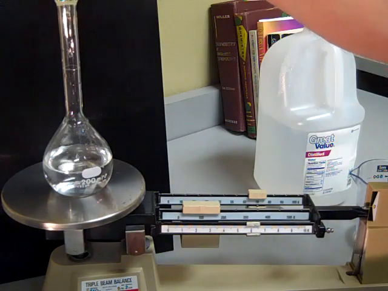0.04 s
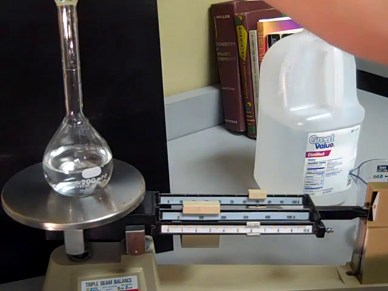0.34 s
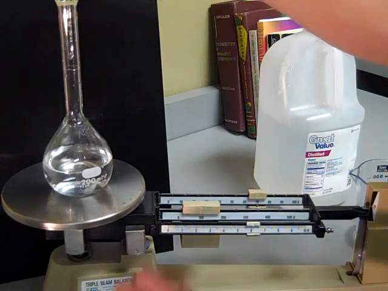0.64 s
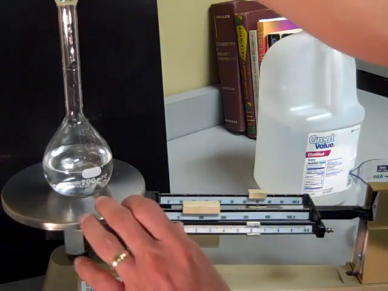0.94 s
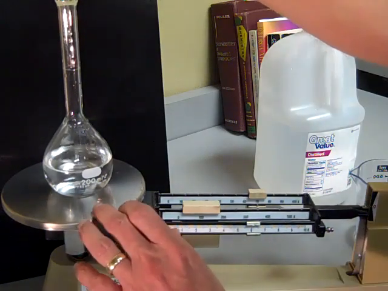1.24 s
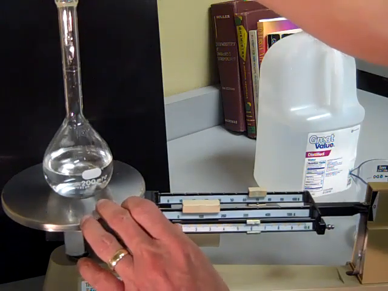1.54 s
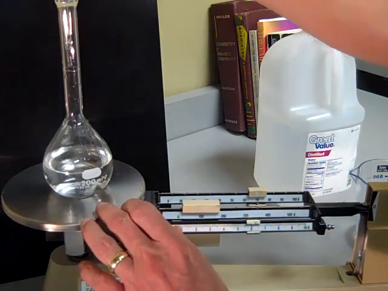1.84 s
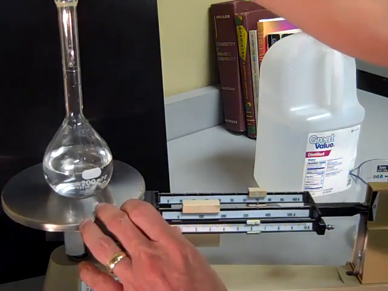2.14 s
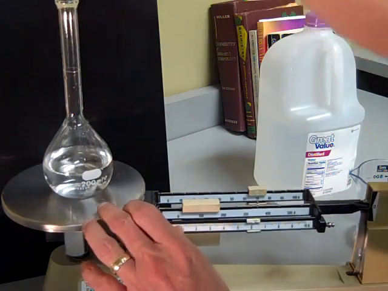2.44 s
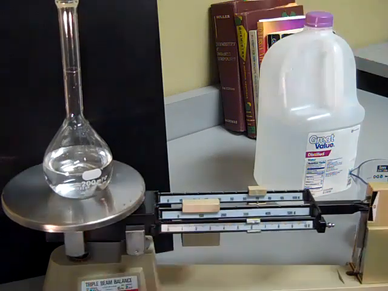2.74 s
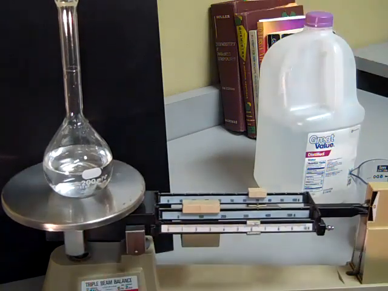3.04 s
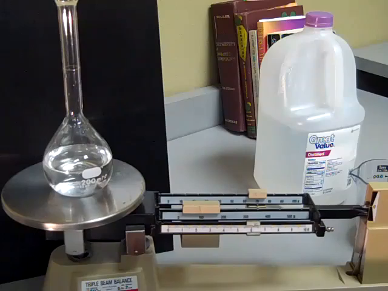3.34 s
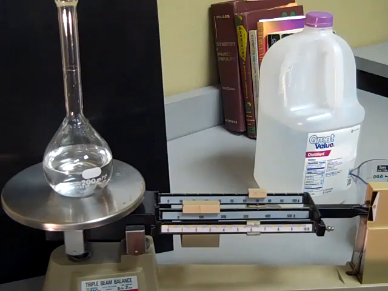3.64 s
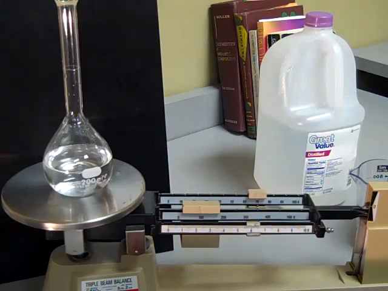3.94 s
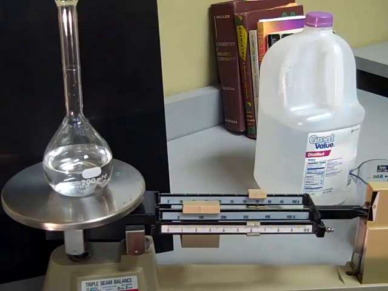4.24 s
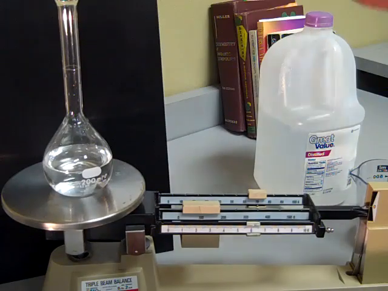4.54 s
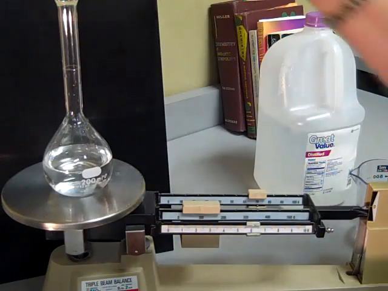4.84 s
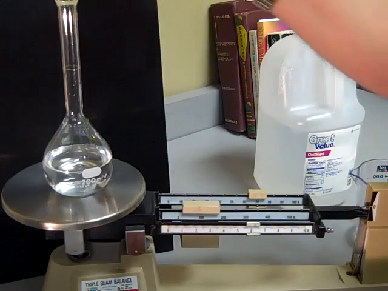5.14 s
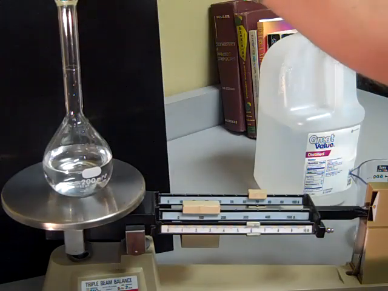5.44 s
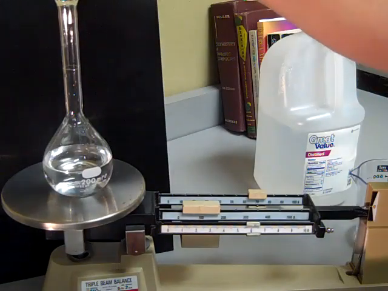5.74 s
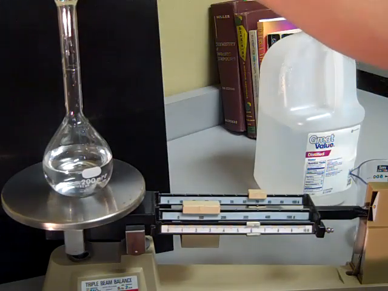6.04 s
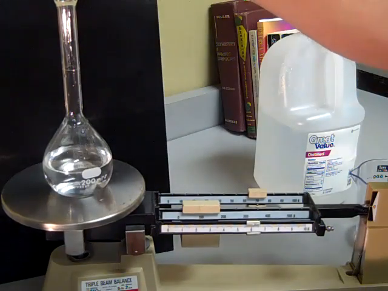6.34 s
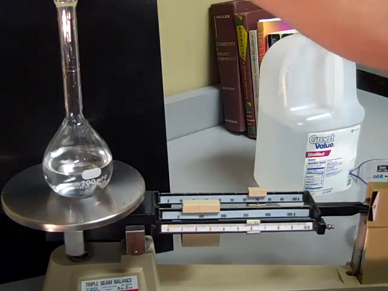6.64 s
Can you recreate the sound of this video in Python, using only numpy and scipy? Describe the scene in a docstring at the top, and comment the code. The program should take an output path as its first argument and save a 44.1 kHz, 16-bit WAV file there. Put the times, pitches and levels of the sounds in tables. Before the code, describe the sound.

A dropper clinks on a ringing glass flask in a small humming room, with dull knocks and a few faint water plinks.

```python
"""A small laboratory, close to a beam balance where a glass flask is topped up with a dropper.
Left of the microphones the dropper clinks against the neck and sets both glasses ringing; the loudest
clink overloads the left microphone. Drops plink as they trap bubbles, something ticks, things bump on
the bench, the beam taps its stop, a hand brushes past and two thin whistles glide by.
Ventilation hums steadily behind it, with a faint electronic whine far left."""
import sys
import numpy as np
from scipy import signal
from scipy.fft import rfft, irfft
from scipy.io import wavfile

SR = 44100
rng = np.random.default_rng(int(sys.argv[2]) if len(sys.argv) > 2 else 0)


def store_wav(level_fs):
    """Save 16-bit WAV to argv[1]."""
    pcm = np.round(np.clip(np.atleast_2d(level_fs), -1, 1) * 32767)
    wavfile.write(sys.argv[1], SR, pcm.T.astype(np.int16))


N = 295029
TIME = np.arange(N) / SR
RING_TIME = np.arange(SR // 2) / SR  # seconds since a strike
HARD_RISE_S, SOFT_RISE_S = .00017, .0007  # attack of a ring after a hard and a soft touch


def undb(db):
    """Decibels to gain."""
    return 10 ** (np.asarray(db) / 20)


def unit(x):
    """Scale to rms 1."""
    return x / np.sqrt(np.mean(x ** 2))


def fade(t60):
    """Exponential decay, 60 dB down after t60 seconds."""
    return np.exp(-np.log(1000) * RING_TIME / t60)


def attack(rise_s):
    """Exponential rise from 0 towards 1."""
    return 1 - np.exp(-RING_TIME / rise_s)


def progress(start, length):
    """Runs from 0 to 1 during a gesture."""
    return np.clip((TIME - start) / length, 0, 1)


def colour(x, spectrum):
    """Filter a sound by a spectrum of (Hz, dB) points."""
    hz, db = np.transpose(spectrum)
    bins = np.fft.rfftfreq(len(x), 1 / SR)
    gain = undb(np.interp(np.log(bins + 1), np.log(hz), db))
    return irfft(rfft(x) * gain, len(x))


def drift(rate_hz):
    """Smooth random drift with rms 1."""
    bins = np.fft.rfftfreq(N, 1 / SR)
    return unit(irfft(rfft(rng.standard_normal(N)) * np.exp(-(bins / rate_hz) ** 2), N))


def burst(spectrum, t60):
    """Coloured noise that dies away."""
    return unit(colour(rng.standard_normal(len(RING_TIME)), spectrum)) * fade(t60)


def ring(modes, gains=1, sharp=0, rise_s=HARD_RISE_S, settle_s=.017):
    """Struck modes start nearly in step, sharp by a share that settles; close pairs beat."""
    hz, db, t60 = np.transpose(modes)[:, :, None]
    clock = RING_TIME + np.reshape(sharp, (-1, 1)) * settle_s * attack(settle_s)
    phase = 2 * np.pi * hz * clock + .5 * rng.standard_normal(hz.shape)
    waves = np.sin(phase) * undb(db) * fade(t60)
    return np.sum(waves.T * gains, axis=1) * attack(rise_s)


def pan(x, left_db):
    """Make the left channel left_db louder than the right, keeping the mid level."""
    gains = undb(np.array([[left_db], [-left_db]]) / 2)
    return x * gains / gains.mean()


def add(out, start, sound):
    """Mix a sound in at a start time in seconds."""
    i = int(start * SR)
    out[..., i:i + sound.shape[-1]] += sound[..., :N - i]


def room(x, wet_db):
    """Strong early reflections from bench and walls, then a fainter bright tail; each side differs."""
    wet = []
    for _ in range(2):
        late = burst([(100, -12), (7000, .5), (10000, 2), (14000, -22)], t60=.27)
        early = burst([(100, 1.3), (5000, 29), (14000, 8.7)], t60=.036)
        tail = (late + undb(15) * early) * (1 - np.exp(-(RING_TIME / .0015) ** 2))
        wet.append(signal.fftconvolve(x.mean(axis=0), tail / np.linalg.norm(tail))[:N])
    return x + pan(np.array(wet), left_db=5.5) * undb(wet_db)


def ventilation():
    """Moving air fills the room, alike at both microphones in the bass, with a few duct resonances."""
    # Rush of air. Each row: frequency in Hz, relative noise density in dB.
    air_spectrum = [(15, -51), (25, -21), (122, -11), (155, -14), (187, -4), (213, -7.5), (372, -4.5),
                    (525, -14), (781, -16), (868, -20), (940, -16), (1600, -31.5), (6500, -39), (8030, -39),
                    (14000, -45.5)]
    # Stereo width. Each row: frequency in Hz, side minus mid in dB.
    width_spectrum = [(30, -8.5), (80, -5), (160, -12.5), (350, -16.5), (700, -11), (1400, -2.5),
                      (3000, 0.5), (12000, 0.5)]
    # Stereo balance. Each row: frequency in Hz, left minus right in dB.
    left_spectrum = [(30, 8.5), (120, 1), (700, -0.5), (1400, 4.5), (3000, 4.5), (12000, 2)]
    # Noisy duct resonances. Each row: centre in Hz, width in Hz, level in dB.
    duct_bands = [(130.1, 21, -62), (265, 57, -53), (376, 18.4, -59), (7950, 1500, -71.5)]
    mid, side = (colour(rng.standard_normal(N), air_spectrum) for _ in range(2))
    side = colour(side, width_spectrum)
    channels = []
    for sign in (1, -1):
        tilt = [(hz, sign * db / 2) for hz, db in left_spectrum]
        channels.append(colour(mid + sign * side, tilt))
    air = np.array(channels) * undb(-48.5) / np.std(mid)
    bins = np.fft.rfftfreq(N, 1 / SR)
    for hz, width, db in duct_bands:
        resonance = 1 / (1 + ((bins - hz) / width) ** 2) ** 2
        air += undb(db) * unit(irfft(rfft(rng.standard_normal(N)) * resonance, N))
    return air * undb(.12 * drift(.876))


def motor_hum():
    """Motor tones in the background wander together with its speed, and each wavers on its own."""
    # Pitch of each motor tone in Hz.
    tone_hz = [187.9, 798, 918.5, 964, 1059.5, 1179]
    # The same tones. Each row: level in dB, waver as a share, left minus right in dB.
    tone_levels = [(-51, 0.36, 1.5), (-63.5, 0.088, -1.5), (-59, 0.22, -4.5), (-72, 0.28, -4),
                   (-65, 0.25, -2), (-71.5, 0.33, -20.5)]
    out = np.zeros((2, N))
    clock = np.cumsum(1 + .0015 * drift(3.2)) / SR
    for hz, (db, waver, left_db) in zip(tone_hz, tone_levels):
        sway = 1 + waver * (drift(3.5) + 1j * drift(9.9))  # in level and phase
        tone = unit(np.real(sway * np.exp(2j * np.pi * hz * clock)))
        out += pan(tone * undb(db), left_db)
    return out


def electronic_whine():
    """Close high tones, far to the left, beat into a fast flutter."""
    # Tones of the whine. Each row: frequency in Hz, rms level in dB.
    tones = [(7827, -89), (7886, -76), (7945, -69.5), (8004, -94), (8062, -74)]
    whine = sum(np.sqrt(2) * undb(db) * np.sin(2 * np.pi * hz * TIME) for hz, db in tones)
    return pan(whine * undb(2 * drift(2.9)), left_db=54.5)


def whistles():
    """On the left a thin whistle glides up and another down, wavering in pitch and level."""
    # Glides. Each row: start in seconds, length in seconds, first and last pitch in Hz, level in dB.
    glides = [(2.65, 0.084, 8200, 9400, -70), (2.8, 0.19, 10400, 8670, -67.5)]
    out = np.zeros(N)
    for start, length, first_hz, last_hz, db in glides:
        turn = np.pi * progress(start, length)
        pitch = first_hz + (last_hz - first_hz) * np.sin(turn / 2) ** 2
        pitch *= 1 + .012 * drift(14) + .0031 * drift(144)
        envelope = np.sin(turn) * undb(db + 3 * drift(80))
        out += np.sin(2 * np.pi * np.cumsum(pitch) / SR) * envelope
    return pan(out, left_db=9)


def hand_brushes():
    """A hand brushes past on the left: uneven rubbing noise swells and fades."""
    # Strokes of the hand. Each row: start in seconds, length in seconds, level in dB.
    strokes = [(0.572, 0.061, -58.5), (0.64, 0.019, -59)]
    out = np.zeros(N)
    rub = unit(colour(rng.standard_normal(N), [(500, 1), (2000, 1), (7000, 5), (14000, 2)]))
    rub *= undb(2 * drift(90))
    for start, length, db in strokes:
        out += rub * np.sin(np.pi * progress(start, length)) * undb(db)
    return pan(out, left_db=9)


def bench_bumps():
    """Straight ahead, soft blows thud through the bench top, which booms low; gentler ones are duller."""
    # Blows on the bench. Each row: start in seconds, thud level in dB, boom level in dB.
    blows = [(1.348, -42.5, -41), (2.319, -70, -51), (2.491, -34, -50), (3.3936, -30, -44),
             (3.400, -27.5, -35), (3.41, -37.5, -42.5), (3.507, -36.5, -38), (4.153, -34.5, -36),
             (4.164, -35.5, -35), (4.62, -38.5, -37), (4.948, -49, -46.5)]
    # Noise of the hardest thud. Each row: frequency in Hz, relative level in dB.
    thud_spectrum = [(40, -34), (80, -19), (130, -4), (250, 0), (480, 5), (850, -2), (1200, -7), (1950, -8),
                     (2400, -17), (4000, -24), (8000, -26), (14000, -44)]
    # Bench top modes. Each row: frequency in Hz, level against the thud in dB, t60 in seconds.
    bench_modes = [(280.6, -11, 0.21), (395, -6.5, 0.12), (480, -6, 0.099), (640, -12.5, 0.046),
                   (887, -10, 0.11), (2030, -15, 0.032)]
    out = np.zeros(N)
    hardest_db = max(row[1] for row in blows)
    for start, thud_db, boom_db in blows:
        dulled = [(hz, db + .3 * (thud_db - hardest_db) * (hz > 1000)) for hz, db in thud_spectrum]
        thud = burst(dulled, t60=.09) * undb(thud_db)
        boom = ring([(117, 0, .2), (138, -8, .15)]) * undb(boom_db)
        body = ring(bench_modes) * undb(thud_db)
        add(out, start, (thud + body + boom) * attack(.002))
    return pan(out, left_db=1)


def beam_taps():
    """Left of centre, the metal beam ticks against its stop and rings briefly."""
    # Taps on the stop. Each row: start in seconds, level in dB.
    taps = [(3.22, -59), (3.299, -56), (3.401, -45), (3.5054, -29.5), (4.5171, -59)]
    # Beam modes. Each row: frequency in Hz, relative level in dB, t60 in seconds.
    beam_modes = [(2330, -9.5, 0.041), (3338, -6, 0.064), (3420, -11, 0.019), (4540, -17, 0.027),
                  (4850, -20, 0.018), (4980, -9, 0.012), (5850, -5.5, 0.027), (8100, -11.5, 0.069)]
    tick_spectrum = [(100, -7), (700, 5), (1500, 2.5), (5500, -2.5), (7000, -18), (8300, -4),
                     (14000, -14)]
    out = np.zeros(N)
    for start, db in taps:
        tick = burst(tick_spectrum, t60=.015) * undb(.5)
        add(out, start, (ring(beam_modes) + tick) * undb(db))
    return pan(out, left_db=7)


def tick_and_drops():
    """A small dry tick rings near 1.4 and 3.5 kHz; later, drops splash in the neck and trap bubbles."""
    # Two rows of tick, then the drops. Each row: start in seconds, pitch in Hz, level in dB,
    # t60 in seconds.
    pings = [(2.249, 1370, -43, 0.085), (2.2495, 3550, -44, 0.014), (5.775, 1410, -48, 0.06),
             (5.785, 1150, -49, 0.08), (5.838, 1240, -48, 0.2), (5.891, 1425, -47, 0.08),
             (5.935, 1240, -51, 0.25)]
    out = np.zeros(N)
    for start, hz, db, t60 in pings:
        pitch = hz * (1 + .0078 * drift(60)[:len(RING_TIME)])
        tone = np.sin(2 * np.pi * np.cumsum(pitch) / SR) * fade(t60)
        noise = burst([(hz / 2, -30), (hz, 0), (2 * hz, -36)], t60=.04) * undb(-8.5)
        add(out, start, (tone + noise) * attack(.00038) * undb(db))
    return pan(out, left_db=2)


def dropper_clinks():
    """Close on the left, each touch rings flask and dropper; the spot hit favours modes near one pitch. Soft
    touches start more slowly, yet even a soft rebound revives the flask's singing tone. Each touch also gives a
    broad snap and a low pop on the left, by far the loudest on the hardest clink."""
    # Dropper against the neck. Each row: start in seconds, levels of contact, flask ring and
    # singing tone in dB, centre of the ring in Hz, kind of touch.
    clinks = [(0.1046, -29.5, -32.5, -57, 6990, "tip"), (0.203, -45, -39, -77, 10500, "flick"),
              (0.3946, -37, -52, -78, 8000, "tick"), (1.038, -36.5, -53, -75, 8470, "tick"),
              (1.796, -68, -60, -82, 6900, "tick"), (2.244, -51, -60, -75, 7300, "graze"),
              (2.3145, -54, -72, -80, 7300, "graze"), (2.392, -45, -63, -73, 6550, "graze"),
              (2.4115, -31, -24, -45, 6420, "rim"), (2.4803, -19, -21.5, -44, 6250, "rim"),
              (2.4916, -34, -37, -42, 6840, "rim"), (5.5740, -16, -20.5, -35, 6300, "knock"),
              (5.7727, -35.5, -46.5, -43.5, 6500, "graze"), (5.829, -26, -23.5, -34.5, 6120, "wall"),
              (5.8962, -39.5, -45.5, -52, 5900, "graze"), (5.904, -43, -59, -50, 5700, "graze"),
              (5.912, -47, -57, -41, 5700, "graze"), (5.9935, -60, -57, -72, 7000, "graze"),
              (6.0026, -40, -44.5, -49.5, 8240, "knock"), (6.125, -70, -72, -71, 5600, "wall"),
              (6.29, -62, -68, -69, 6600, "wall")]
    # Kinds of touch. Each row: fall of flask ring and of contact noise away from the centre in dB per
    # octave, low and top modes against the ring in dB, dropper and snap against the contact in dB.
    touches = {"tip": (80, 7, -22, -28, -10.5, -28), "flick": (64, 4, -35, -32, 0, -9),
               "tick": (62, 35, -25, -30, -34, -38), "graze": (26, -10, 10, -5, -10, 4),
               "rim": (47, -13, -16, -2.5, -15, -8.5), "knock": (15.5, -7.5, -6, -10.5, -17, 2.5),
               "wall": (33, -9, 2, -21, -27, 1.5)}
    # Modes of the flask and the dropper tube. Each row: frequency in Hz, relative dB, t60 in seconds.
    flask_modes = [(1530, -20, .16), (1822, -23.5, .36), (3860, -19, .06), (5386, -23, .85),
                   (5498, -11, .22), (5522, 0, .2), (5572, 13, .032), (5700, -6, .07), (6380, -18, .11),
                   (6590, 1, .028), (6616, -17, .2), (6815, 11, .028), (6895, 5, .033), (6940, -8, .14),
                   (8547, 3, .14), (8552, -4, .38), (11890, 2.5, .06), (13140, 11, .05), (13170, -5, .13),
                   (13650, 0, .058)]
    tube_modes = [(3941, -9, .12), (6988, -11, .15), (7500, 0, .025), (9300, -3, .025), (10850, 7, .024),
                  (13950, -5, .03)]
    # Bright contact noise and a broad snap that comes with each touch. Each row: frequency in Hz, relative
    # level in dB.
    crack_spectrum = [(1000, -40), (4300, -38), (6000, -25), (6900, -9), (7600, 0), (8300, -1), (8900, -18),
                      (10300, -25), (12000, -31), (14000, -34)]
    snap_spectrum = [(40, 5), (500, 0), (1500, -4.5), (2400, -3), (3400, 7), (4200, -3.5), (5200, -44),
                     (9300, 7.5), (10400, -12), (11600, 5), (14000, -24.5)]
    glass, snaps = np.zeros((2, N)), np.zeros(N)
    flask_hz, tube_hz = np.array(flask_modes)[:, 0], np.array(tube_modes)[:, 0]
    low = flask_hz < 4500
    top = flask_hz > 9000  # the shortest waves beam towards the left microphone
    singing = (flask_hz > 5300) & (flask_hz < 5550)  # the lingering modes
    sharp = .0072 * singing  # contact stiffens them for a moment
    tube_fall = 7.7  # dB per octave away from the centre
    hardest_db = max(row[1] for row in clinks)
    for start, contact_db, ring_db, sing_db, centre_hz, touch in clinks:
        ring_fall, crack_fall, low_db, top_db, dropper_db, snap_db = touches[touch]
        soft_db = .52 * (contact_db - hardest_db)  # quieter clinks: fainter top modes, snap and pop
        rise_s = np.interp(hardest_db - contact_db, [0, 20], [HARD_RISE_S, SOFT_RISE_S])

        spot_db = -ring_fall * np.abs(np.log2(flask_hz / centre_hz))
        mode_db = np.select([low, singing, top], [low_db, sing_db - ring_db, top_db + soft_db], spot_db)
        gains = undb(ring_db + mode_db)
        add(glass, start, pan(ring(flask_modes, gains * ~top, sharp, rise_s), left_db=5.5))
        add(glass, start, pan(ring(flask_modes, gains * top, rise_s=rise_s), left_db=12.5))

        tube_db = contact_db + dropper_db - tube_fall * np.abs(np.log2(tube_hz / centre_hz))
        add(glass, start, pan(ring(tube_modes, undb(tube_db), rise_s=rise_s), left_db=6))

        focused = [(hz, db - crack_fall * abs(np.log2(hz / centre_hz))) for hz, db in crack_spectrum]
        crack = burst(focused, t60=.024) * attack(rise_s) * undb(contact_db)
        add(glass, start, pan(crack, left_db=11))

        snap = burst(snap_spectrum, t60=.0097)
        pop = undb(-12) * np.exp(-RING_TIME / .0012)  # one-sided pulse
        add(snaps, start, (snap + pop) * undb(contact_db + snap_db + soft_db))
    return room(glass, wet_db=-10) + pan(snaps, left_db=19)


def scene():
    """Close glass, with more room around the drops and the bench, over the steady background."""
    small_sounds = room(beam_taps() + whistles() + hand_brushes(), wet_db=-4)
    pings = room(tick_and_drops(), wet_db=3.5)
    glass = dropper_clinks()
    bumps = room(bench_bumps(), wet_db=-1.5)
    background = ventilation() + motor_hum() + electronic_whine()
    return background + small_sounds + bumps + pings + glass


def record(dry):
    """The loudest clink overloads the microphone input; a steep low-pass cuts the top."""
    top_hz = 14100
    lowpass = signal.ellip(8, .2, 70, top_hz, fs=SR, output="sos")
    return signal.sosfilt(lowpass, np.clip(dry, -.85, .85))


dry = scene()
out = record(dry)
store_wav(out)
```